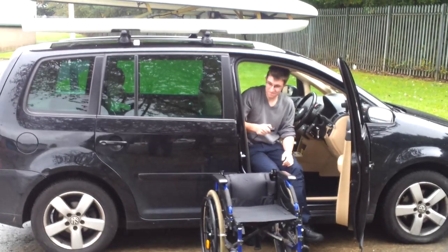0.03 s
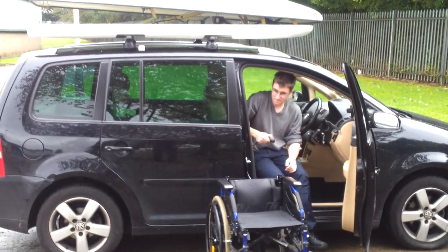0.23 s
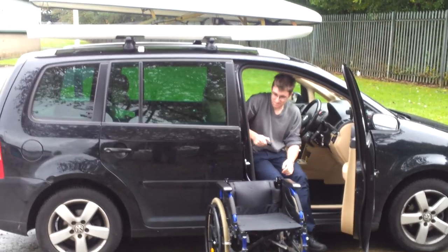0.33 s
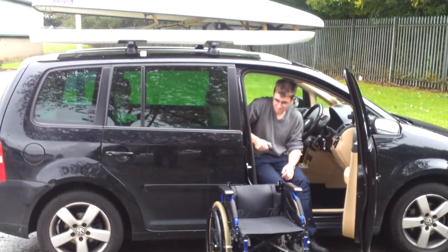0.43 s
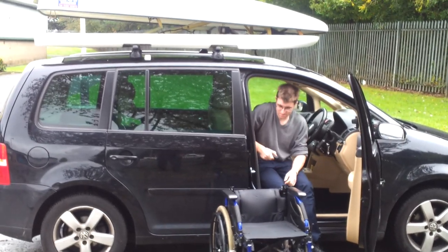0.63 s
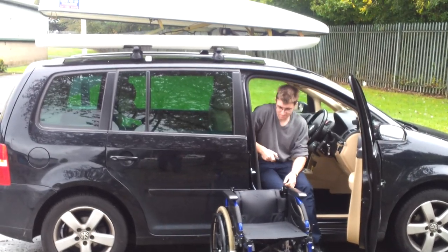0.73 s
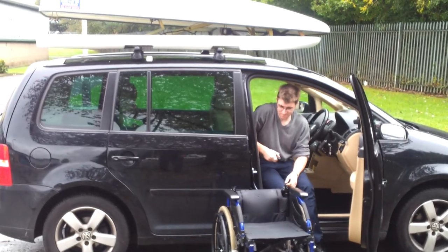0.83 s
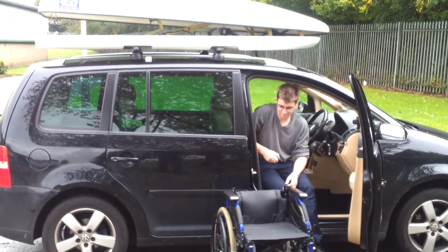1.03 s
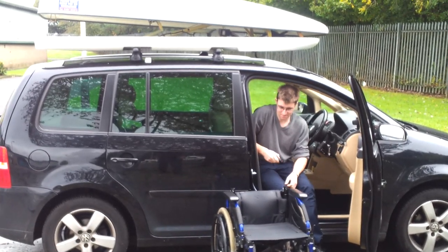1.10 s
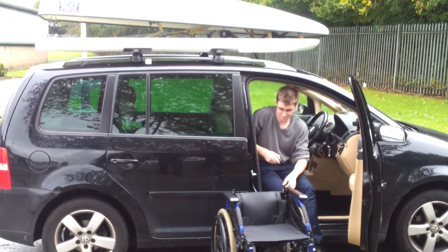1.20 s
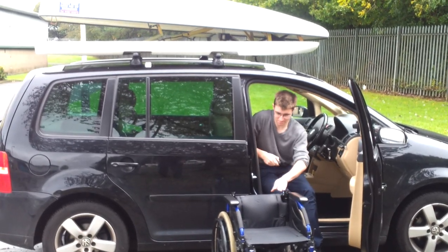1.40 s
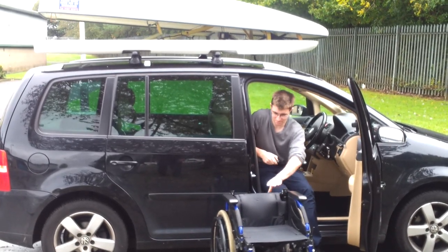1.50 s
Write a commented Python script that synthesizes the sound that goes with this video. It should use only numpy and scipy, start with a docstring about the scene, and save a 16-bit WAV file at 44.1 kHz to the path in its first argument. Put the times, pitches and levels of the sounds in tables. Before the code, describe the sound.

One quick metal clack from a folding wheelchair outdoors, against a low traffic hum.

```python
"""Distant traffic and a low engine drone are heard first, and go on throughout. Then a folding
wheelchair beside a parked car is knocked once. Its metal parts clack together in a quick cluster;
the impacts set the tube frame ringing and the seat thudding, each in its own damped modes.
The open yard throws the sound back as a thin diffuse tail and a few echoes."""
import sys
import numpy as np
from scipy import signal
from scipy.fft import rfft, irfft
from scipy.io import wavfile

SR = 44100
rng = np.random.default_rng(int(sys.argv[2]) if len(sys.argv) > 2 else 0)


def dump_mix(stems):
    """Bounce the given channels to the path in sys.argv[1] as a 16-bit WAV at rate SR."""
    frames = np.atleast_2d(stems).T  # one column per channel
    limited = np.clip(frames, -1, 1)  # hard clip at full scale
    pcm = np.round(limited * 32767).astype(np.int16)
    wavfile.write(sys.argv[1], SR, pcm)


N = 68355

# spectra of the traffic and its hiss (frequency [Hz], relative level [dB])
TRAFFIC_SPECTRUM = [(20, -8), (35, -9.5), (80, 0.5), (150, -3), (230, 0.5), (350, -4.5), (700, -2),
                    (1100, 0), (1600, -5.5), (2400, -9), (3200, -14.5), (4000, -23), (6200, -33),
                    (8000, -65)]
HISS_SPECTRUM = [(1000, -12), (2600, 1.5), (4000, -1), (5200, 2), (6200, -2.5), (7200, -14), (7700, -30),
                 (8100, -48)]
# envelopes of traffic, hiss and drone (time [s], level [dB])
TRAFFIC_ENVELOPE = [(0, -38), (.5, -38), (.85, -38), (1.05, -39), (1.3, -39), (1.55, -39.5)]
HISS_ENVELOPE = [(0, -49), (.5, -47.5), (.8, -52.5), (1.1, -53), (1.3, -50.5), (1.55, -52)]
DRONE_ENVELOPE = [(0, -45.5), (.33, -53), (.48, -47), (.58, -61), (.8, -47.5), (.92, -52.5), (1.18, -43.5),
                  (1.4, -53.5), (1.53, -43.5)]
# spectrum of the yard's tail (frequency [Hz], gain [dB])
TAIL_SPECTRUM = [(150, -6), (500, -7), (1200, -0.5), (2500, -14.5), (4000, -13), (6000, -11.5), (8500, -13)]
# its reverberation time (frequency [Hz], T60 [s])
TAIL_T60 = [(200, 0.58), (1200, 0.38), (2800, 0.83), (5000, 0.75), (8000, 0.56)]
# reflections from fence and walls (delay [s], gain [dB], band centre [Hz])
ECHOES = [(.068, -19.5, 2480), (.172, -24, 2800), (.24, -23, 2960), (.345, -33.5, 4480)]
# modes of seat with side panels, and of tube frame (frequency [Hz], relative level [dB], T60 [s])
SEAT_MODES = [(211.9, -13, .45), (246.3, -7, 0.37), (287, -6, 0.15), (344, -6, 0.12), (437, 2, 0.094),
              (514, -1.5, 0.11), (607.7, -6, 0.13), (699, -8.5, 0.19), (1064, -10.5, 0.18)]
FRAME_MODES = [(2278, -1, .16), (2436, -3, .16), (2631, -2, .14), (2818, 0, .17), (2973, -4, .17),
               (3642, -6, .14), (4387, -6, .17), (4676, -3, .19), (4897, -2, .19), (5120, -1, .19),
               (5293, -4, .17), (5852, -5, .17), (6217, -5, .17), (6394, -6, .18)]
# dense ring of brackets, spokes and fittings (frequency [Hz], relative level [dB])
CLACK_SPECTRUM = [(60, -23), (130, -28), (300, -7.5), (1000, -9.5), (1350, -11.5), (2000, -3), (2600, 0.5),
                  (3300, -1.5), (4000, -4.5), (5000, 2), (5700, -2.5), (6500, -2.5), (7200, -11.5),
                  (8000, -31), (9000, -38)]
# contacts within the knock (time [s], relative level [dB])
CONTACTS = [(0.2104, -4.5), (0.2120, 2), (0.2152, 1), (0.225, -0.5)]

TIME = np.arange(N) / SR
FREQS = np.fft.rfftfreq(N, 1 / SR)


def amp(db):
    """Decibels to amplitude ratio."""
    return 10 ** (np.asarray(db) / 20)


def unit(x):
    """Normalisation to rms 1."""
    return x / np.sqrt(np.mean(x ** 2) + 1e-20)


def read(points, hz):
    """Interpolation on a log-frequency axis."""
    f, value = np.transpose(points)
    return np.interp(np.log(hz + 1), np.log(f + 1), value)


def level(points):
    """Amplitude envelope, interpolated in decibels."""
    return amp(np.interp(TIME, *np.transpose(points)))


def add(mix, start_s, sound):
    """Superposition of a delayed sound."""
    part = mix[round(start_s * SR):][:len(sound)]
    part += sound[:len(part)]


def coloured(spectrum):
    """Random phases turn a spectrum into steady noise of rms 1."""
    phases = np.exp(2j * np.pi * rng.random(len(FREQS)))
    return unit(irfft(phases * amp(read(spectrum, FREQS)), N))


def fade(t, t60):
    """Exponential decay, 60 dB in t60."""
    return np.exp(-np.log(1000) * t / t60)


def rise(seconds):
    """Linear onset ramp."""
    return np.minimum(TIME / seconds, 1)


def ring(modes):
    """Free vibration: a sum of damped sinusoids of random phase."""
    return sum(amp(db) * fade(TIME, t60) * np.sin(2 * np.pi * (hz * TIME + rng.random()))
               for hz, db, t60 in modes)


def traffic():
    """Incoherent addition: far tyres merge into an even wash, with a faint hiss on top."""
    wash = level(TRAFFIC_ENVELOPE) * coloured(TRAFFIC_SPECTRUM)
    return wash + level(HISS_ENVELOPE) * coloured(HISS_SPECTRUM)


def engine_drone(pitch_hz=52.6, waver_hz=0.88):
    """Frequency and amplitude modulation: one low engine note wavers and swells."""
    waver = unit(irfft(rng.standard_normal(len(FREQS)) * (FREQS < 5), N))
    phase = 2 * np.pi * np.cumsum(pitch_hz + waver_hz * waver) / SR
    return np.sqrt(2) * level(DRONE_ENVELOPE) * np.sin(phase)


def yard_reflections(source, spread_s=.006, width_octaves=.7):
    """Reflection and scattering: convolution with a diffuse tail and smeared echoes."""
    hz, times, noise = signal.stft(rng.standard_normal(N), SR, nperseg=256)
    t60 = read(TAIL_T60, hz)[:, None]
    energy_norm = np.sqrt(2 * np.log(1000) / (t60 * SR))
    tail = noise * fade(times, t60) * amp(read(TAIL_SPECTRUM, hz))[:, None] * energy_norm
    response = signal.istft(tail, SR, nperseg=256)[1][:N] * rise(0.029)
    for delay, db, centre_hz in ECHOES:
        scatter = unit(rng.standard_normal(N) * TIME * np.exp(-TIME / spread_s)) / np.sqrt(N)
        band = 1 / np.hypot(1, np.log2((FREQS + 1) / centre_hz) / width_octaves * 2)
        response += amp(db) * irfft(rfft(scatter) * band * np.exp(-2j * np.pi * FREQS * delay), N)
    return signal.fftconvolve(source, response)[:N]


def wheelchair_knock(metal_rise_s=0.00035, seat_rise_s=0.0086):
    """Impact excitation: the fittings' dense modes clack as noise, the frame rings, the seat thuds."""
    chair = np.zeros(N)
    attack = rise(metal_rise_s)
    for start_s, db in CONTACTS:
        clack = attack * fade(TIME, t60=.15) * coloured(CLACK_SPECTRUM)
        add(chair, start_s, amp(db - 12.5) * clack)
    hardest_contact_s = CONTACTS[1][0]
    add(chair, hardest_contact_s, amp(-20.5) * attack * ring(FRAME_MODES))
    add(chair, .214, amp(-18.5) * rise(seat_rise_s) * ring(SEAT_MODES))
    return chair


def scene():
    """Superposition of direct sound, reflections and background."""
    chair = wheelchair_knock()
    return (chair + yard_reflections(chair) + traffic() + engine_drone())[None]


def record(dry, ceiling=.72, knee=4, soften_hz=8200, edge_hz=9070):
    """Saturation rounds the loudest peaks; two low-pass filters limit the band."""
    rounded = dry / (1 + abs(dry / ceiling) ** knee) ** (1 / knee)
    softened = signal.sosfilt(signal.butter(12, soften_hz, fs=SR, output="sos"), rounded)
    band_edge = signal.firwin(255, edge_hz, window=("kaiser", 9), fs=SR)
    return signal.oaconvolve(softened, band_edge[None], "same")


dry = scene()
out = record(dry)
dump_mix(out)
```